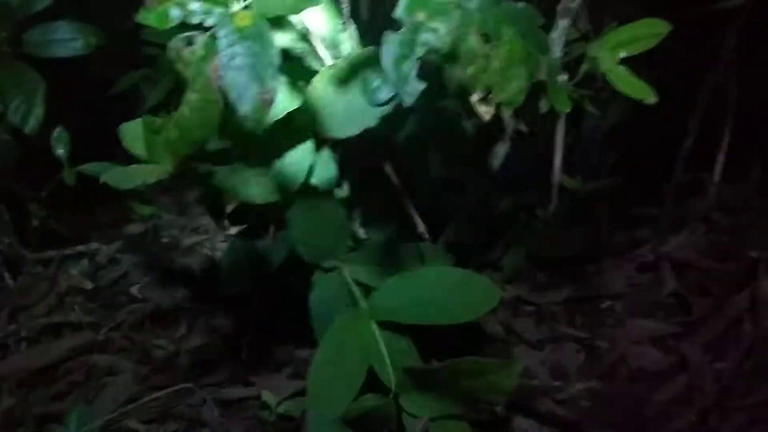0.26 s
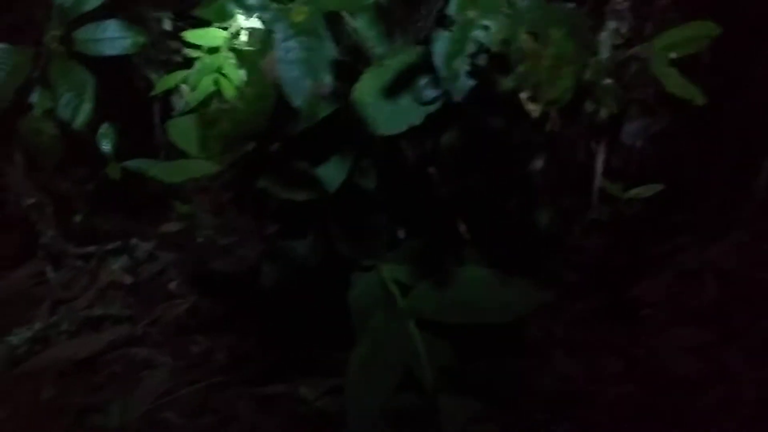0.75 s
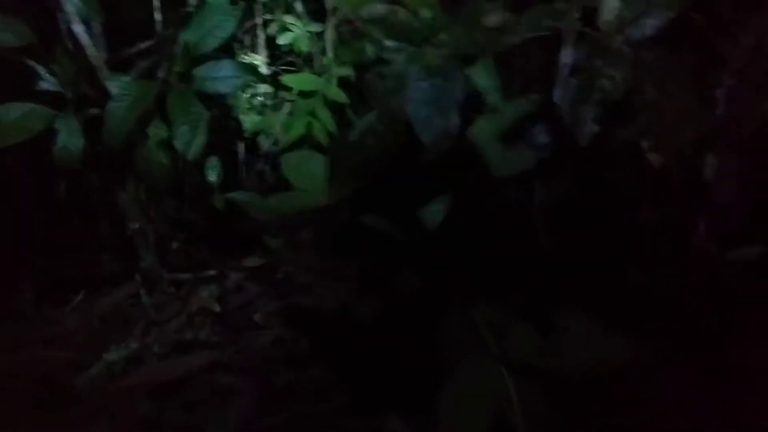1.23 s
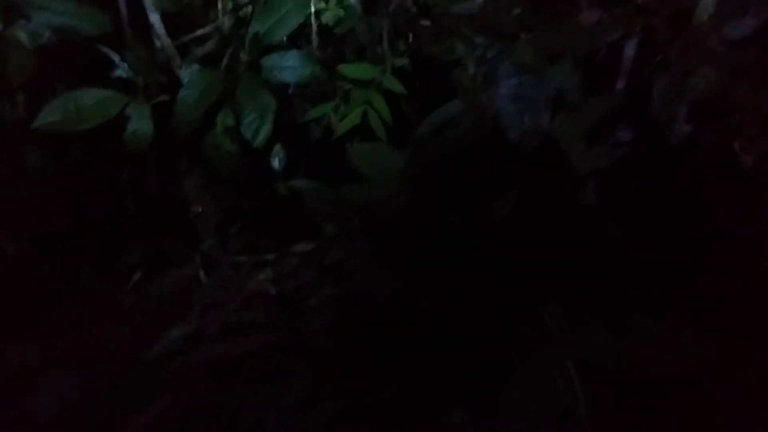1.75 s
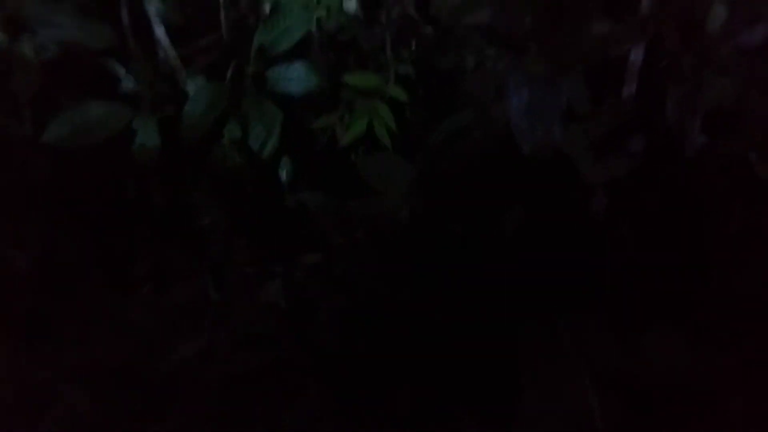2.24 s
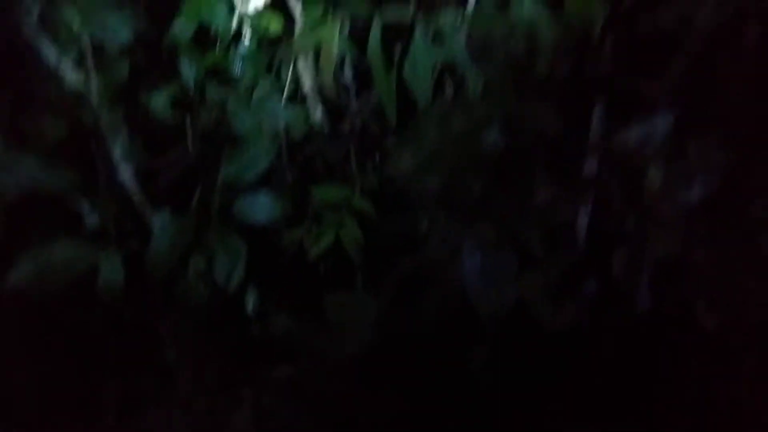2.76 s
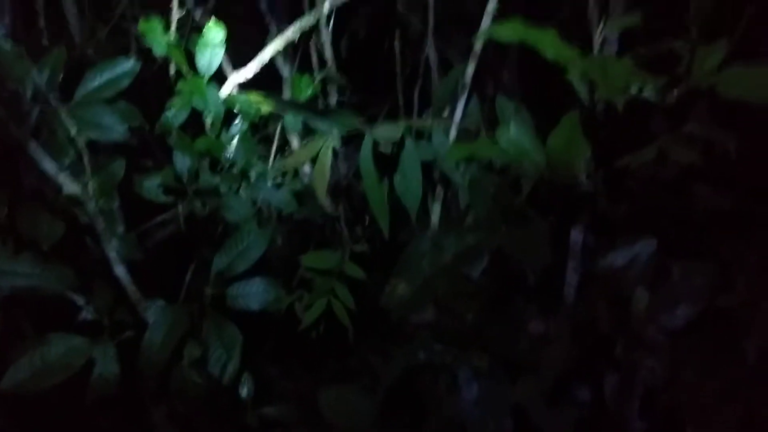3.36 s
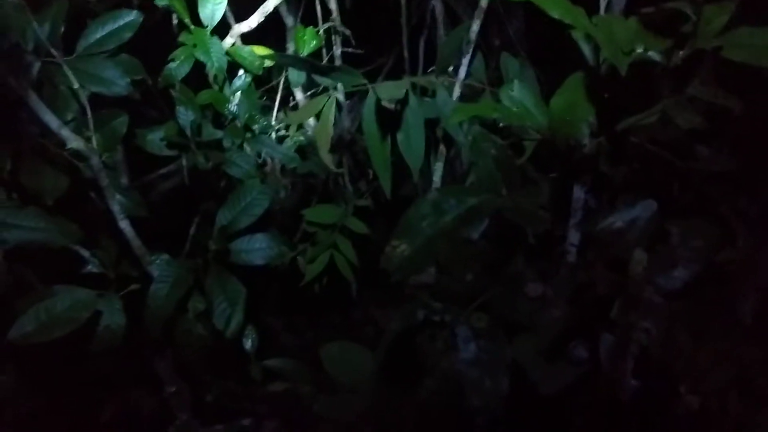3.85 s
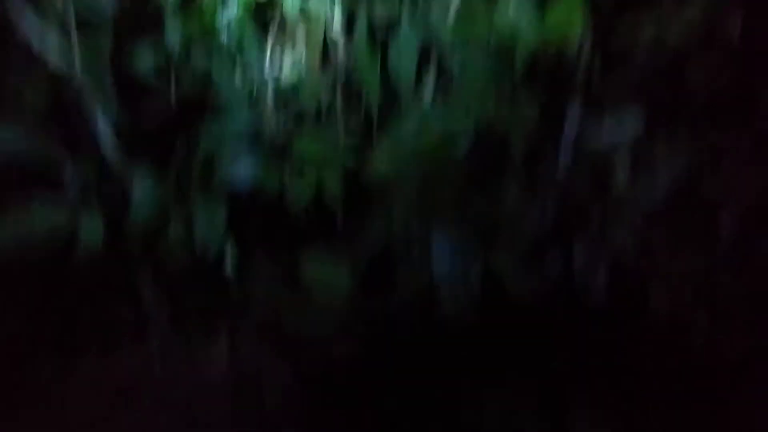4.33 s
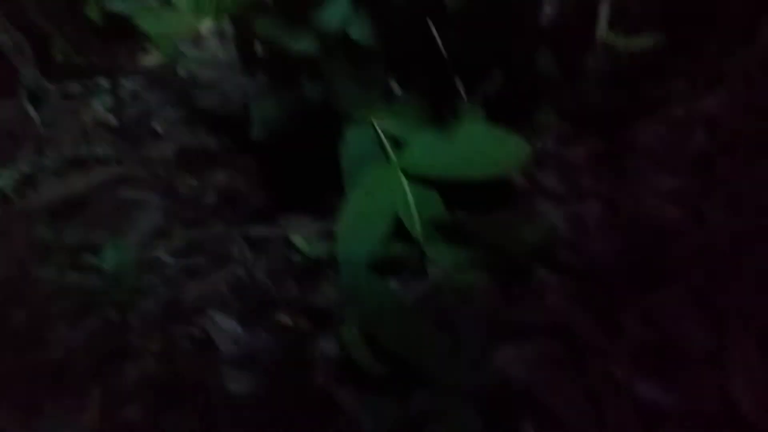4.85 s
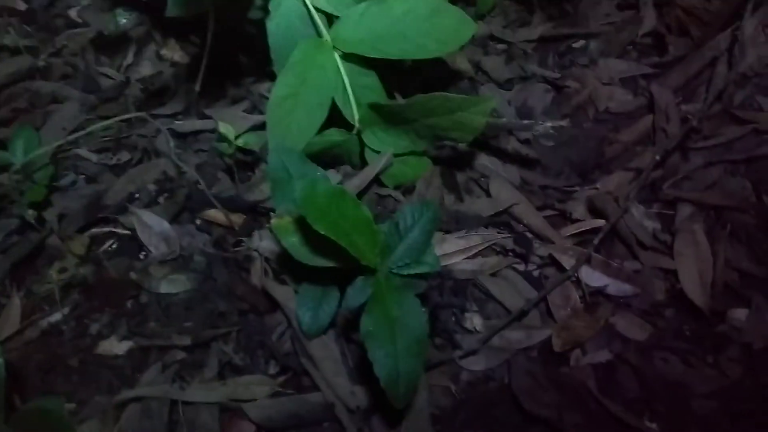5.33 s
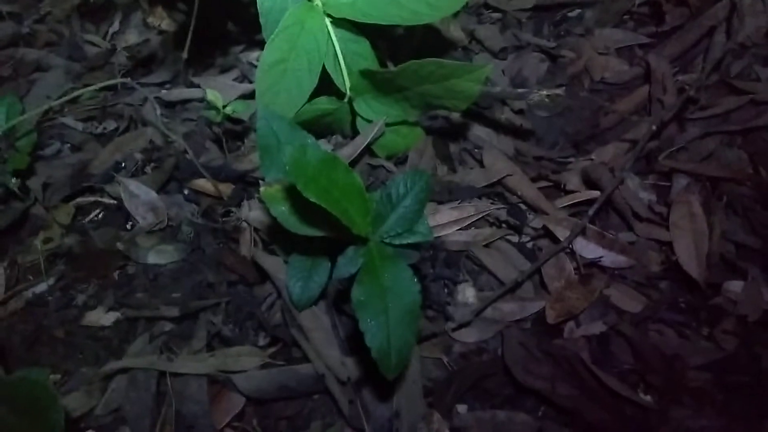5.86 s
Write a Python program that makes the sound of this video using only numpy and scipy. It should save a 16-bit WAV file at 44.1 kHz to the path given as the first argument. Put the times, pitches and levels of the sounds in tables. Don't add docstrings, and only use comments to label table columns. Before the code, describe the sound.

A nocturnal insect chorus shimmers around a high continuous trill while a frog gives six short low rolls and a branch brushes crisply past.

```python
import sys
import numpy as np
from scipy import signal
from scipy.fft import rfft, irfft, next_fast_len
from scipy.io import wavfile
from scipy.ndimage import uniform_filter1d, map_coordinates

SR = 44100
rng = np.random.default_rng(int(sys.argv[2]) if len(sys.argv) > 2 else 0)


def store_wav(level_fs):
    pcm = np.round(np.clip(np.atleast_2d(level_fs), -1, 1) * 32767)
    wavfile.write(sys.argv[1], SR, pcm.T.astype(np.int16))


def makeup_ratio(level_db):
    decades = np.asarray(level_db, float) / 20
    return 10 ** decades


N = 268569
TIME = np.arange(N) / SR


# (time [s], level [dB])
NEAR_LEVEL = [(0.36, -52.5), (0.57, -44), (.75, -47), (1.0, -47.5), (1.49, -53.5), (1.85, -47),
              (2.0, -50.5), (2.9, -49), (3.5, -44), (3.85, -45.5), (4.3, -48.5), (4.4, -51.5),
              (4.69, -42.5), (4.83, -40.5), (5.13, -47), (5.56, -40.5), (6.09, -44.5)]
# (time [s], wing tone [Hz], strokes [per s], right ear's phase lead [rad])
NEAR_SONG = [(.36, 4285, 117, -1.5), (.8, 4281, 117, -1.5), (1.2, 4271, 116.4, -2.5),
             (2.2, 4268, 115.6, -2.5), (3.4, 4258, 114.6, -2.5), (4.0, 4258, 114.3, -2.5),
             (4.9, 4266, 114, -1.5), (6.09, 4262, 113.9, -.5)]
# (time [s], level [dB], wing tone [Hz], strokes [per s])
SECOND_SONG = [(0, -59, 4338, 101.7), (.4, -58, 4336, 102), (1.2, -55.5, 4345, 103), (3, -55, 4347, 103),
               (4.5, -54, 4350, 104), (6.09, -50, 4352, 104)]


def trillers():
    near_db = curves(NEAR_LEVEL)[0]
    tone_hz, rate, lead = curves(NEAR_SONG)
    start = np.clip((TIME - .36) / .28, 0, 1)
    tone_hz = tone_hz + rate - 200 * (1 - start) ** 2 + 2.5 * wobble(15)
    near = strokes(tone_hz, rate, duty=.75, attack=.08, sweep=7.0, overtone_db=-27, lead=lead)
    near = near * makeup_ratio(near_db - 6.0 + 1.6 * wobble(30)) * np.minimum(start * 7.7, 1)
    near = near * makeup_ratio([[-.8], [.8]])

    second_db, tone_hz, rate = curves(SECOND_SONG)
    tone_hz = tone_hz + rate + 2.01 * wobble(15)
    second = strokes(tone_hz, rate, duty=0.635, attack=0.028, sweep=3.0, overtone_db=-27.5, lead=-0.033)
    second = makeup_ratio(second_db + 2.5 * wobble(30)) * second

    kin = noise([(3000, 0), (6000, 0)], 0.33)
    kin = unit(filtered(kin, lambda f: resonance(4350, 900)(f) ** 5))
    kin_db = near_db - 10 + 5 * start + 1.16 * wobble(4.07)
    return among_trees(near, -8.0, 0.6) + among_trees(second, -12.0, 1.0) + makeup_ratio(kin_db) * kin


# (start [s], length [s], stroke period [s], peak level [dB])
RISING_PHRASES = [
    (3.377, .29, .0345, -41.5),
    (4.657, .425, .0344, -45),
]
# (start [s], length [s], stroke period [s], peak level [dB])
STEADY_PHRASES = [
    (1.506, .48, .0337, -58),
    (3.21, .6, .0343, -62),
]


def chirpers():
    track, t = np.zeros(N + SR), np.arange(SR // 20) / SR
    strain = np.exp(-((t - .014) / .006) ** 2)

    def stroke(length):
        return np.clip(np.minimum(t, length - t) / .003, 0, 1)

    for start, length, period, db in RISING_PHRASES:
        for since, arch_db in zip(*phrase(start, length, period)):
            cold = np.exp(-since / 0.07)
            turn = 2 * np.pi * (5314 - 240 * cold) * t
            octave = makeup_ratio(-15 - 5 * cold) * strain * np.sin(2 * turn)
            tone = makeup_ratio(arch_db) * np.sin(turn) + octave
            add(track, start + since - .004, makeup_ratio(db + 6.5) * stroke(0.018) * tone)

    turn = 2 * np.pi * 5110 * t
    tone = makeup_ratio(7) * np.sin(turn) + np.sin(2 * turn)
    for start, length, period, db in STEADY_PHRASES:
        for since, arch_db in zip(*phrase(start, length, period)):
            add(track, start + since, makeup_ratio(db + arch_db + 9.5) * stroke(0.01) * tone)
    return among_trees(track[:N], -11.0, 0.25) * makeup_ratio([[1.8], [-1.8]])


# (start [s], length [s], level [dB], time to turn harsh [s])
RASPS = [
    (0.279, 0.15, -38, 0.043),
    (4.448, 0.12, -37, 0.07),
    (5.352, 0.12, -38, 0.017),
]
# (time [s], peak level [dB], time to fade by 60 dB [s])
HIGH_RASPS = [
    (1.573, -65.5, 0.064),
    (2.915, -59, 0.22),
    (3.6935, -64, 0.091),
    (5.7897, -72.5, 0.15),
]


def bush_crickets():
    gaps = SR / 500 * np.exp(.4 * rng.standard_normal(int(N / SR * 800)))
    tooth_force = makeup_ratio(0.49 * rng.standard_normal(len(gaps)))
    teeth = np.bincount(np.cumsum(gaps).astype(int), tooth_force)[:N]
    scrape = teeth + 0.054 * rng.standard_normal(N)

    pure = unit(filtered(scrape, lambda f: resonance(6930, 280)(f) * resonance(7050, 1300)(f) ** 3))
    in_step = np.sin(2 * np.pi * np.cumsum(6900 + 60 * wobble(150)) / SR)
    pure = unit(pure + 2.5 * in_step)
    harsh = unit(filtered(scrape, lambda f: (resonance(6000, 2400)(f) * resonance(7300, 1500)(f)) ** 4))
    upper = unit(filtered(scrape, lambda f: resonance(12900, 4000)(f) ** 6))
    high = unit(filtered(scrape, lambda f: resonance(11500, 3000)(f) ** 4))

    track, swell_s = np.zeros(N), 0.048
    for s, length, peak_db, harsh_s in RASPS:
        since = np.clip(TIME - s, 0, length)
        swell_db = -1 * np.maximum(1 - since / swell_s, 0)
        fade_db = -14.5 * np.maximum(since - swell_s, 0) / length
        upper_db = -18.5 - 16 * np.maximum(1 - since / 0.044, 0)
        gate = np.clip(np.minimum(since / 0.0042, (length - since) / 0.029), 0, 1)
        share = np.clip(since / harsh_s, 0, 1) ** 2
        rasp = np.sqrt(1 - share) * pure + np.sqrt(share) * harsh + makeup_ratio(upper_db) * upper
        track += gate * makeup_ratio(peak_db + swell_db + fade_db + 0.5) * rasp
    for s, db, t60 in HIGH_RASPS:
        fade_db = -60 * np.maximum(TIME - s - .03, 0) / t60
        track += np.clip((TIME - s) / 0.0012, 0, 1) * makeup_ratio(db + 5.5 + fade_db) * high
    return among_trees(track, -6.5, 0.45)


# (time [s], peak level [dB])
FROG_NOTES = [
    (2.192, -50.5),
    (2.542, -49),
    (2.898, -45),
    (3.268, -44),
    (3.637, -46),
    (4.003, -46.5),
]
# (tone [Hz], level [dB], time to fade by 60 dB [s])
THROAT = [(669.4, 5, 0.057), (807, 8, 0.034), (895, -1, 0.035), (1218, -12, 0.21), (1440, -12.5, 0.094)]


def frog():
    track, t = np.zeros(N + SR), np.arange(SR // 10) / SR
    for note_s, note_db in FROG_NOTES:
        for k in range(5):
            s = note_s + k * .0315 + rng.normal(0, .0012)
            db = note_db - 0.7 * k ** 2
            croak_db = -1.0 - 2.5 * (k - 1.5) ** 2
            sac = np.sin(2 * np.pi * 488 * (t - .5 * t * t))
            sac = sac * (1 - np.exp(-t / 0.0037)) * makeup_ratio(-60 * np.maximum(t - .01, 0) / 0.054)
            croak = 0
            for hz, level, t60 in THROAT:
                ring = np.sin(2 * np.pi * hz * rng.normal(1, 0.026) * t)
                croak = croak + makeup_ratio(level + rng.normal(0, 3.4) - 60 * t / t60) * ring
            rough = uniform_filter1d(rng.standard_normal(len(t)), size=60) * np.sqrt(60)
            croak = croak * (1 + .5 * rough) * (1 - np.exp(-t / 0.0029))
            add(track, s - .003, makeup_ratio(db - 0.93) * (sac + makeup_ratio(croak_db) * croak))
    return among_trees(track[:N], -6, 0.17)


# (start [s], length [s], from [Hz], to [Hz], level [dB])
WHISTLES = [
    (.2, 0.19, 1360, 2020, -69),
    (1.69, 0.24, 950, 2033, -66),
    (1.788, .13, 864, 877, -75),
    (2.354, 0.084, 925, 917, -73),
    (3.41, 0.11, 898, 892, -72),
    (3.013, 0.029, 1100, 1140, -62),
    (4.785, 0.091, 2586, 2650, -58.5),
]


def whistles():
    calls = 0
    for s, length, from_hz, to_hz, db in WHISTLES:
        u = np.clip((TIME - s) / length, 0, 1)
        hz = to_hz + (from_hz - to_hz) * (1 - u) ** 1.35
        climb_db = 10 * np.log2(hz / to_hz)
        edge_db = -10 * (2 * u - 1) ** 4
        level = (u > 0) * (u < 1) * makeup_ratio(db + climb_db + edge_db + 5 + 3.5 * wobble(40))
        calls = calls + level * np.sin(2 * np.pi * np.cumsum(hz + 15 * wobble(80)) / SR)
    return among_trees(calls, -6.0, 0.47)


# (time [s], peak level [dB], low part [dB])
SNAPS = [(1.2045, -50.5, -3.5), (1.302, -47.5, -8), (1.529, -40, -15.5), (1.6482, -53, 3),
         (2.792, -39, -18), (2.9247, -37, -19), (2.9888, -39.5, -4.5), (3.026, -29.5, -16.5),
         (3.1184, -48, 1.5), (3.2186, -44, -30), (3.262, -39.5, -10), (3.4486, -46, -14)]


def snapping_leaves():
    snaps, t = np.zeros((2, N + SR)), np.arange(SR // 50) / SR
    for s, db, low_db in SNAPS:
        crack = rng.standard_normal(len(t)) * makeup_ratio(db - 5.5 - 60 * t / 0.051)
        add(snaps[0], s, crack)
        add(snaps[1], s, makeup_ratio(low_db + 13) * crack)
    bright = filtered(snaps[0, :N], resonance(16200, 10500))
    low = filtered(snaps[1, :N], resonance(2300, 4000))
    return among_trees(bright + low, -9.0, 0.046)


# (time [s], peak level [dB], tone [Hz])
THUMPS = [(0.058, -58, 183), (0.517, -50.5, 156), (0.728, -60, 208), (1.051, -49, 104), (1.19, -55, 83),
          (2.75, -65, 118), (3.119, -58, 86.1), (3.568, -53.5, 170), (4.349, -54, 154), (4.495, -61, 182),
          (4.648, -52.5, 155), (4.78, -82, 320), (4.917, -63, 320), (5.492, -64, 121)]
# (frequency [Hz], level [dB])
BODY = [(20, -34), (45, -3.5), (100, -1.5), (200, -2), (350, -6.5), (600, -51.5)]


def handling():
    bumps, t = np.zeros(N + SR), np.arange(SR // 8) / SR
    sag = t + 0.0061 * (1 - np.exp(-t / 0.003))
    for s, db, hz in THUMPS:
        thump = (1 - np.exp(-t / 0.0023)) * np.sin(2 * np.pi * hz * sag)
        add(bumps, s, makeup_ratio(db + 9.5 - 60 * t / 0.08) * thump)
    rumble = makeup_ratio(follows(-62.5, 1.3) + 2.6 * wobble(25)) * noise(BODY, 0.87)
    return rumble + bumps[:N] * makeup_ratio([[2.5], [-2.5]])


# (middle [s], half length [s], change [dB])
LOW_RESTS = [
    (4.36, 0.17, -4.5),
    (4.9, 0.15, -15),
]
# (middle [s], half length [s], change [dB])
HIGH_SWELLS = [(0, 0.042, 8.5), (.72, 0.24, 9.5), (1.8, .2, 3.5), (2.85, 0.41, 6), (3.35, 0.39, 6.5),
               (4.65, 0.25, 11), (5.55, 0.36, 8)]


def choruses():
    low = high = 0
    # tone [Hz], strokes [per s], level [dB], right ear's phase lead [rad]
    for hz, rate, db, lead in [(2974, 37.6, -1.0, -0.64), (2934, 25.5, -12, 2.06), (3016, 51, -11, 3.5)]:
        voice = strokes(hz + 12 * wobble(20), rate, duty=.55, attack=.25, sweep=.8, overtone_db=-40, lead=lead)
        low = low + makeup_ratio(db + 1.3 * wobble(14)) * voice
    for hz, rate, db, lead in [(5074, 23.0, 14.5, -5.0), (4910, 34.0, 10.5, 2.7), (5210, 41, 18, -8.1),
                               (5097, 76.0, -3, 2.0), (5170, 14.0, 1.0, -10.5)]:
        tone_hz = hz + 30 * wobble(3) + 30 * wobble(25)
        voice = strokes(tone_hz, rate, duty=0.69, attack=0.15, sweep=3.6, overtone_db=-31.0, lead=lead)
        high = high + makeup_ratio(db + 2.2 * wobble(6.2)) * voice
    pond = filtered(noise(AIR, 0.61), lambda f: resonance(655, 170)(f) ** 2)
    pond = makeup_ratio(3.8 * wobble(9) + 2.8 * wobble(30)) * pond

    low = makeup_ratio(follows(-62.5, 0.4) + swells(LOW_RESTS)) * unit(low)
    high = makeup_ratio(-66 + swells(HIGH_SWELLS)) * unit(high)
    pond = makeup_ratio(follows(-67.5, 0.85)) * unit(pond)
    return among_trees(low, -1.5, 0.41) + among_trees(high, 0.7, 0.71) + pond


# (frequency [Hz], level [dB])
LEAVES = [(1500, -19), (2500, -35.5), (4000, 16.5), (5800, 4), (6800, 3), (8000, -1.5), (10000, -0.5),
          (12500, -3.5), (14000, 1), (15500, -13)]
# (time [s], level [dB])
BRANCH = [
    (2.72, -68),
    (2.886, -66.5),
    (2.93, -56.5),
    (3.018, -58),
    (3.04, -70),
    (3.32, -78),
]


def undergrowth():
    passing = (TIME > BRANCH[0][0]) * (TIME < BRANCH[-1][0]) * makeup_ratio(curves(BRANCH)[0] + 4.5)
    grains = makeup_ratio(1.26 * wobble(300) + 1.2 * wobble(17))
    crackle = unit(makeup_ratio(1.8 * wobble(170) + 1.8 * wobble(40)))
    hiss = (makeup_ratio(follows(-62, .8)) + passing * crackle) * unit(grains * noise(LEAVES, 0.55))
    bark = noise([(1200, -11), (1900, 10), (2300, 19), (2900, -28), (4000, -29)], 0.78)
    return hiss + passing * makeup_ratio(-1) * unit(grains * bark)


# (frequency [Hz], level [dB])
AIR = [(150, -9.5), (300, -6), (500, -3), (1000, -5.5), (1600, -8), (2300, 0.5), (3300, -10.5), (4300, 3),
       (5300, -4), (5800, -43), (9000, -47)]


def night_air():
    return makeup_ratio(follows(-59, 1.14) + 1.95 * wobble(5.5)) * noise(AIR, .85)


# (time [s], level [dB])
FACING = [(0, -1.5), (.3, -2), (.6, 1.5), (1.1, 2), (1.47, -0.5), (1.8, 1), (2.1, -2.5), (2.5, -0.5),
          (2.95, 1.5), (3.25, 4), (3.85, 0), (4.35, -2), (4.7, 3.5), (5.15, -1), (5.7, 3), (6.09, 2.5)]


def follows(level_db, swing):
    return level_db + swing * curves(FACING)[0]


def swells(rows):
    return sum(db * np.exp(-((TIME - s) / half) ** 2) for s, half, db in rows)


def phrase(start, length, period):
    since = np.arange(0, length, period)
    return since, -18 * (since / length - .55) ** 2 + 1.1 * rng.standard_normal(len(since))


def strokes(tone_hz, rate, duty, attack, sweep, overtone_db, lead=0):
    cycle = (np.cumsum(rate * np.ones(N)) / SR + rng.random()) % 1
    u = np.clip(cycle / duty, 0, 1)
    phase = 2 * np.pi * np.cumsum(tone_hz * np.ones(N)) / SR - sweep * u ** 3
    phase = phase + np.array([[-.5], [.5]]) * lead
    swell = (1 - np.exp(-u / attack)) * np.cos(np.pi * u / 2)
    return unit(swell * (np.sin(phase) + makeup_ratio(overtone_db) * np.sin(2 * phase)))


def among_trees(x, wet_db, t60):
    t = np.arange(SR // 2) / SR
    tail = rng.standard_normal((2, len(t))) * makeup_ratio(-60 * t / t60) * (1 - np.exp(-t / 0.0051))
    x = x * np.ones((2, 1))
    return x + makeup_ratio(wet_db) * signal.fftconvolve(x, tail / np.linalg.norm(tail[0]), axes=1)[:, :N]


def noise(spectrum, alike):
    f, v = np.transpose(spectrum)
    shared, own = rng.standard_normal(N), rng.standard_normal((2, N))
    mix = np.sqrt(alike) * shared + np.sqrt(1 - alike) * own
    return unit(filtered(mix, lambda hz: makeup_ratio(np.interp(np.log(hz + 1), np.log(f), v, -120, -120))))


def resonance(centre_hz, width_hz):
    return lambda f: 1j * f * width_hz / (centre_hz ** 2 - f * f + 1j * f * width_hz)


def filtered(x, response):
    m = next_fast_len(N + SR // 4)
    return irfft(rfft(x, m) * response(np.fft.rfftfreq(m, 1 / SR)), m)[..., :N]


def wobble(rate):
    return map_coordinates(rng.standard_normal(int(N * rate / SR) + 4), [TIME * rate])


def curves(rows):
    s, *cols = np.transpose(rows)
    return [np.interp(TIME, s, c) for c in cols]


def unit(x):
    return x / np.sqrt(np.mean(x ** 2) + 1e-20)


def add(track, s, sound):
    track[round(s * SR):][:len(sound)] += sound


def scene():
    singers = trillers() + chirpers() + bush_crickets() + frog() + whistles()
    return singers + snapping_leaves() + handling() + choruses() + undergrowth() + night_air()


def roll_off(x):
    return signal.sosfilt(signal.butter(12, 14940, fs=SR, output="sos"), x)


# (frequency [Hz], lead [rad])
PORTS = [(0, 3.1), (300, 3.0), (450, .4), (1300, .3), (2300, 3.1), (14000, 31.4), (22050, 50.9)]


def record(dry):
    f, lead = np.transpose(PORTS)
    sides = np.array([[-.5], [.5]])

    def response(hz):
        delay = np.exp(1j * sides * np.interp(hz, f, lead))
        brightness = makeup_ratio(sides * 6.9 * (hz / 13000) ** 0.94)
        return delay * brightness * (hz < 14200)

    return roll_off(filtered(dry, response))


dry = scene()
out = record(dry)
store_wav(out)
```